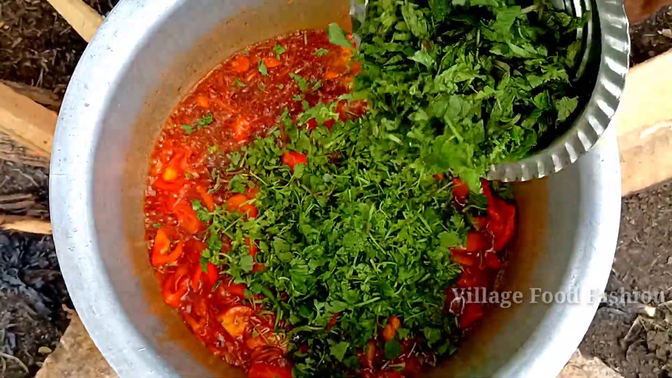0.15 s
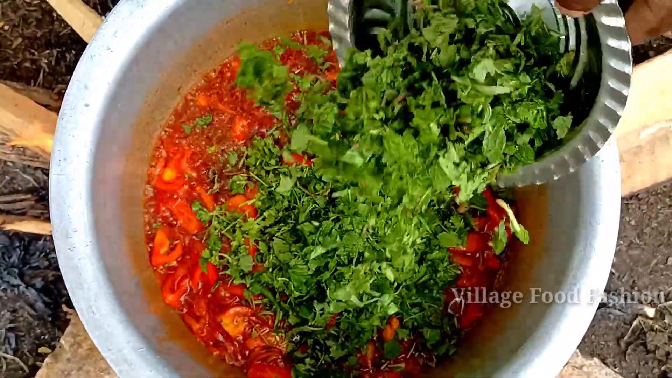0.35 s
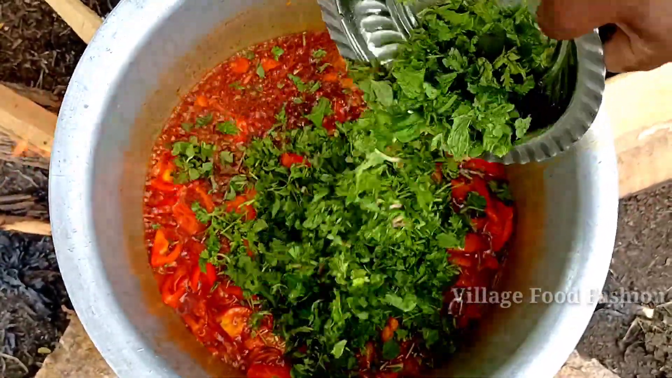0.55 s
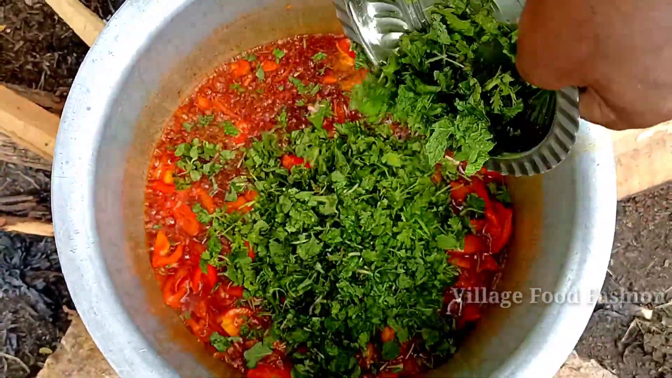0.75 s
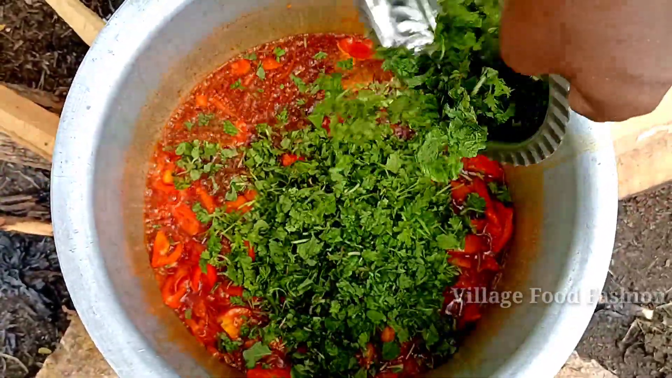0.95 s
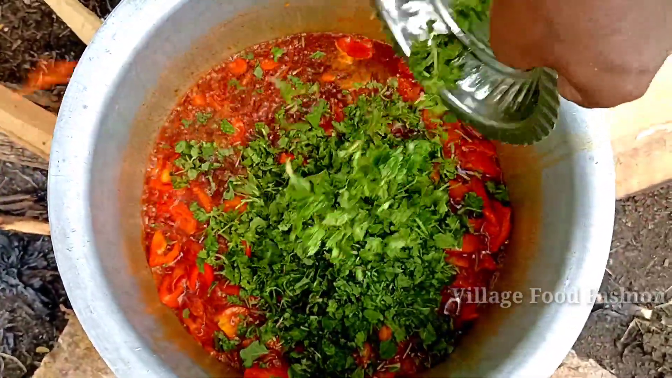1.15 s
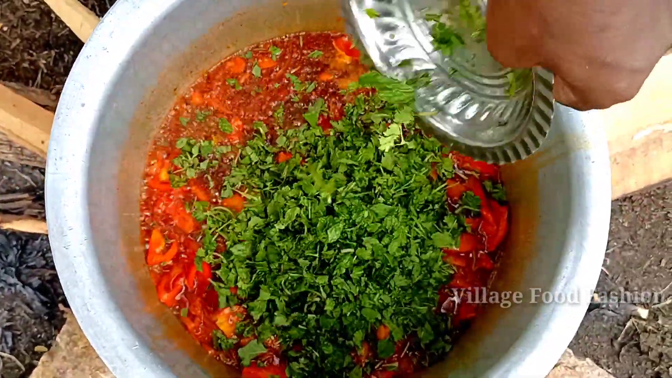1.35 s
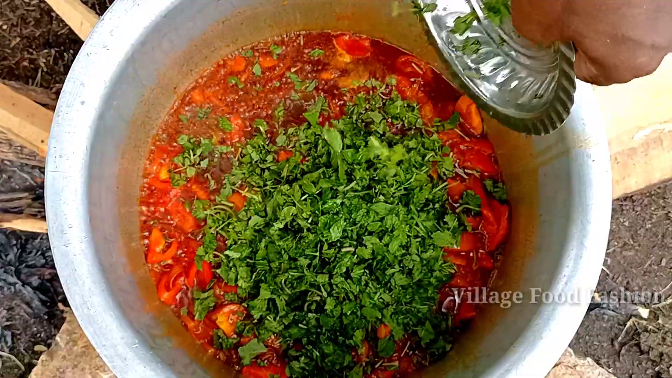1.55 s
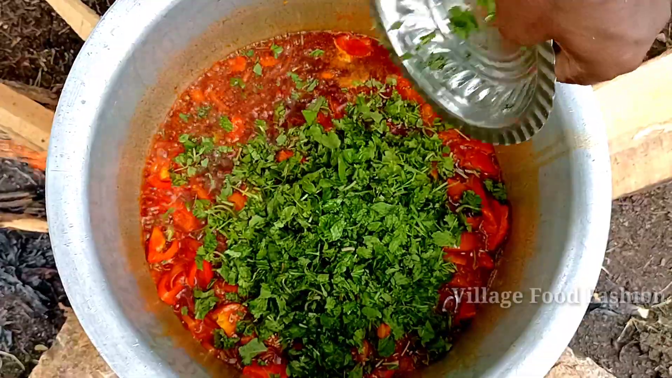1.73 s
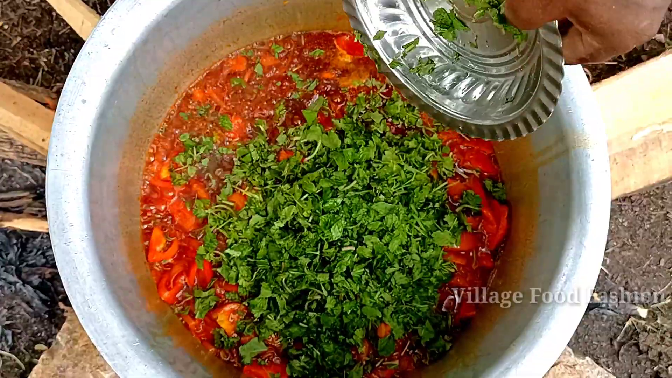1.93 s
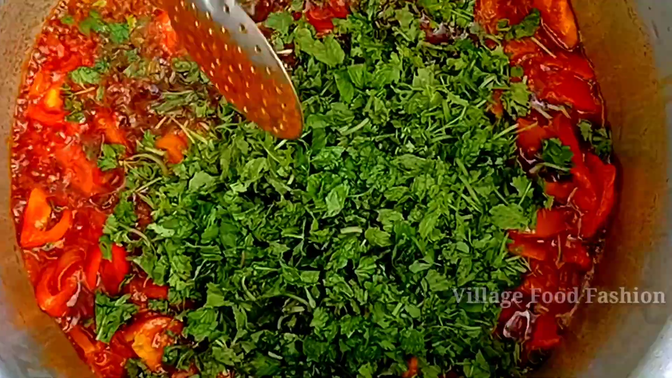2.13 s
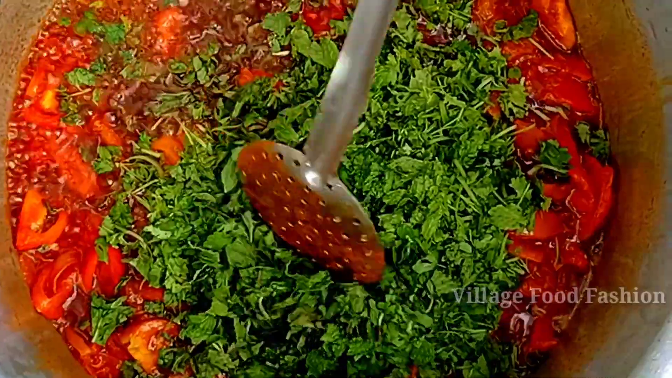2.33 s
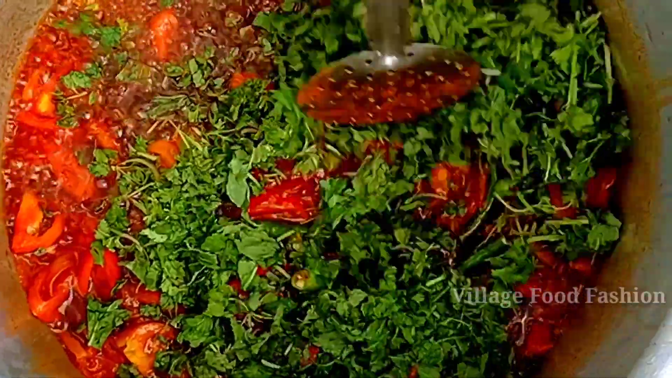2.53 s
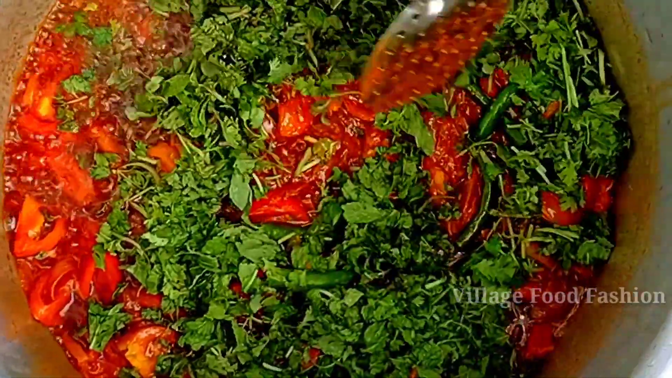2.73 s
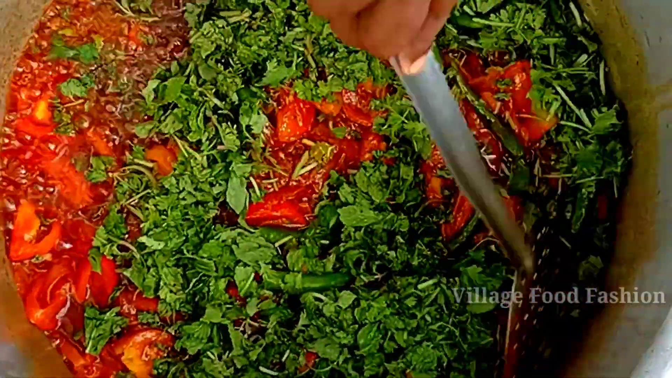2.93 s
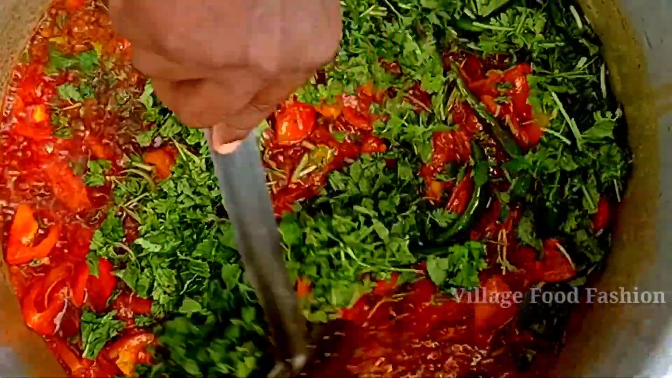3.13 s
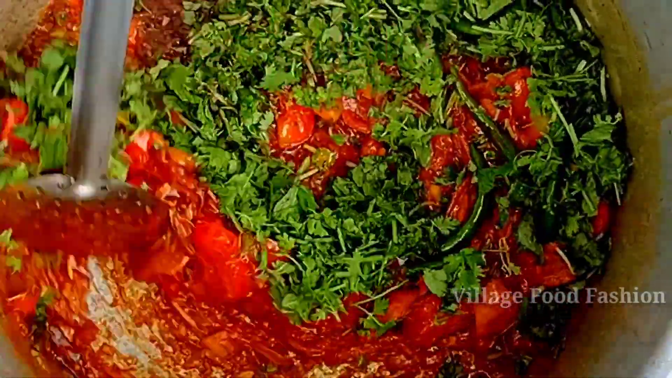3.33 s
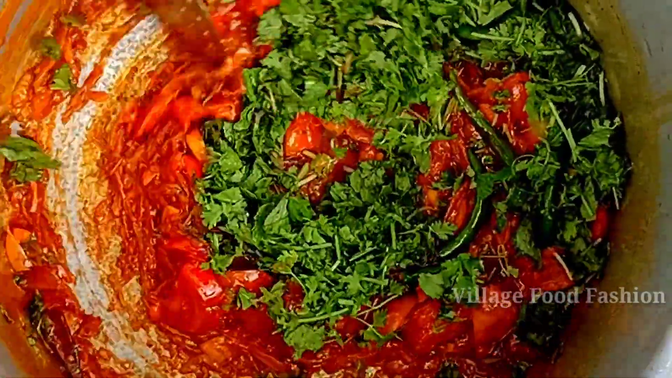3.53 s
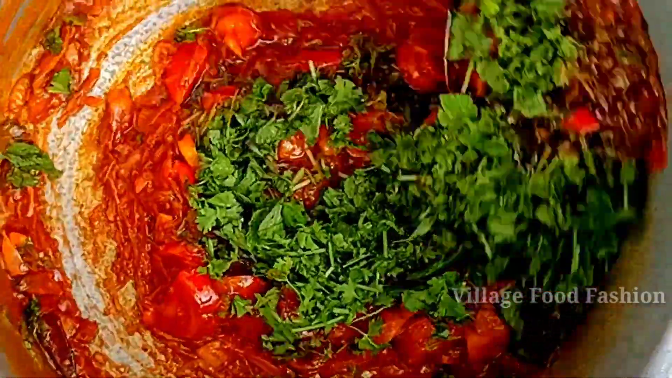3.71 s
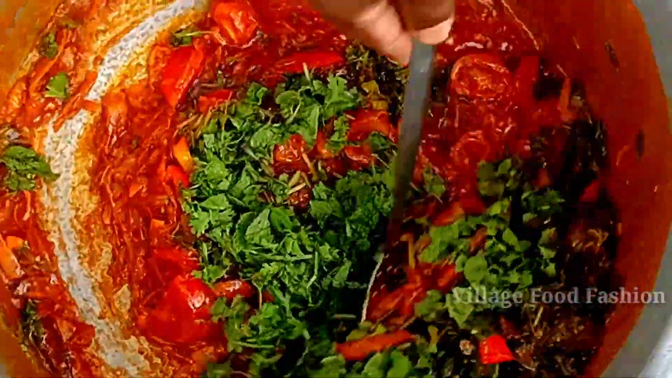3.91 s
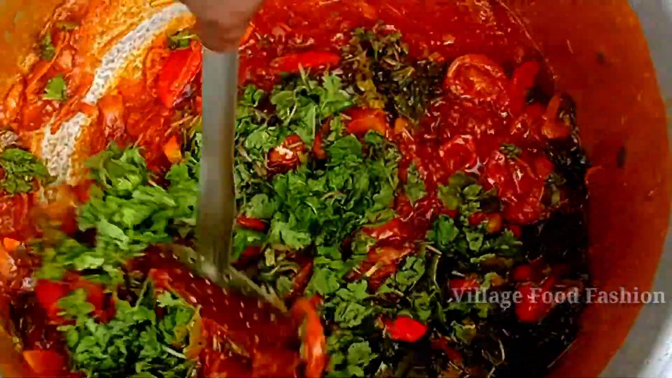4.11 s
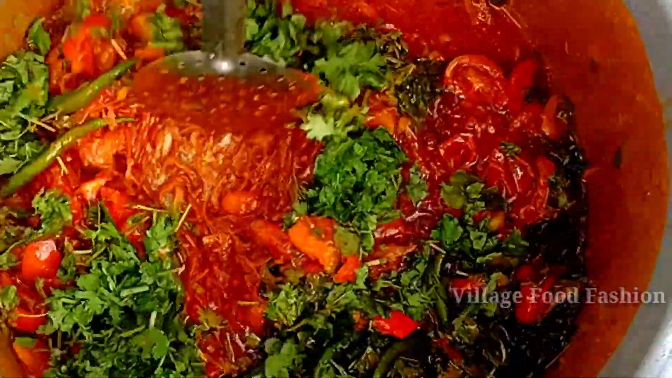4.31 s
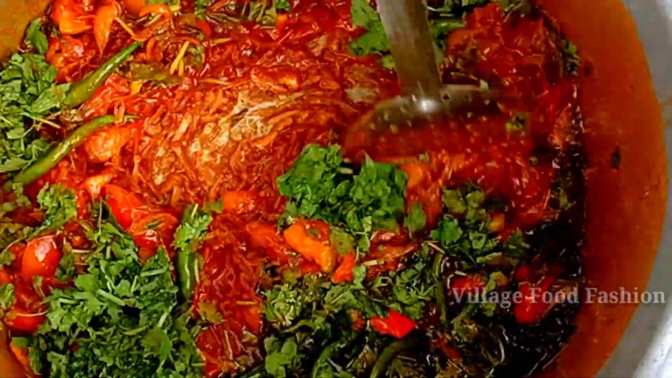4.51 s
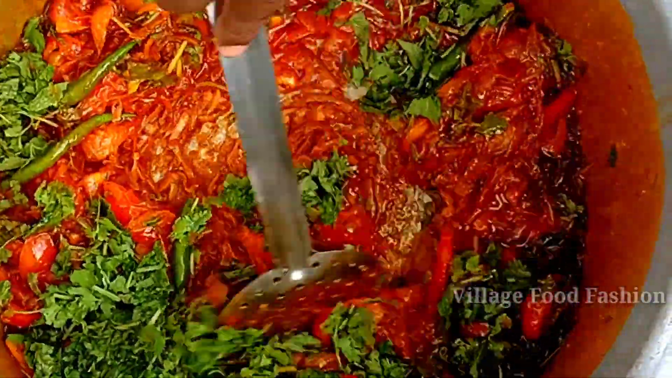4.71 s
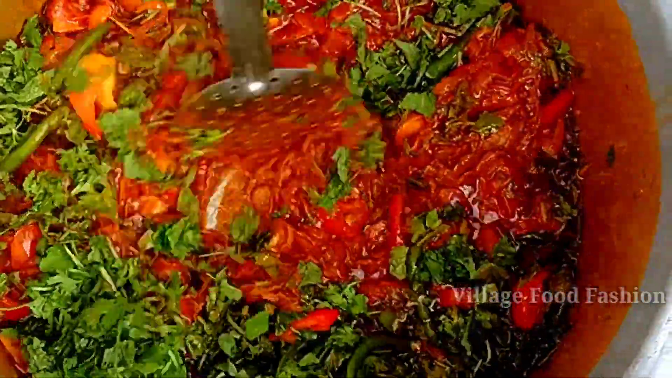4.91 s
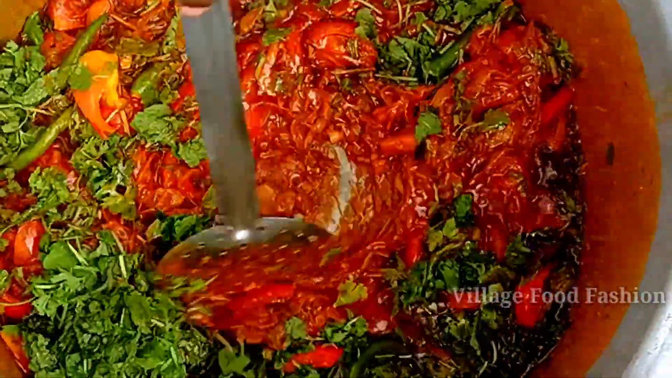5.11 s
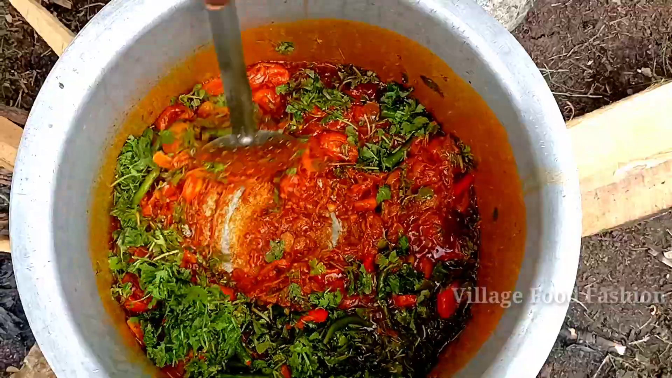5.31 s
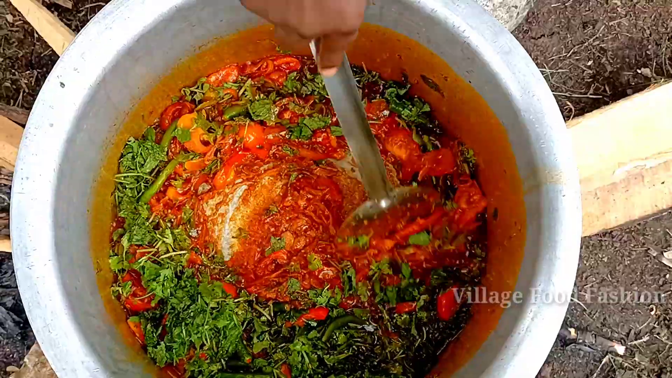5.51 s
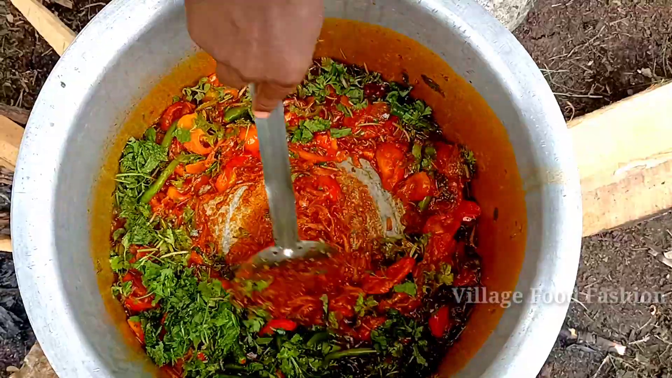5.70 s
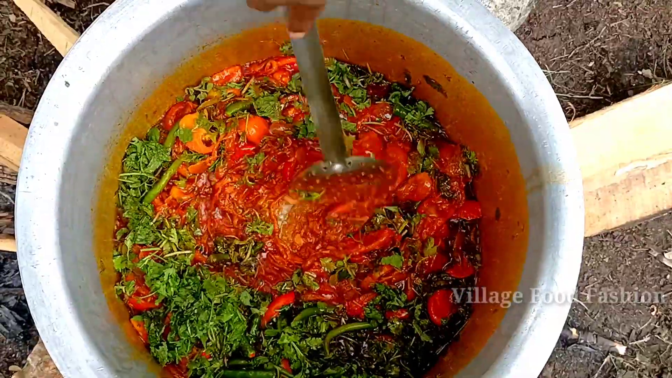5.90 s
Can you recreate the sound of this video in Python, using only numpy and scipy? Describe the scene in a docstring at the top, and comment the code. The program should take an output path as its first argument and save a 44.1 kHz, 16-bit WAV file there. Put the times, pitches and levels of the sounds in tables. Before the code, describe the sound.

Light frying and simmering in a large pot, then a ladle clank, a louder sizzle and repeated metallic scraping.

```python
"""Masala sizzles and simmers in a big aluminium pot outdoors, as tiny steam bubbles burst in the sauce.
The pot knocks, the oil spits, and wet herbs crackle under a steel ladle. With a puff of air the ladle
clanks on the pot and bares the hot bottom, so the sizzle flares up. Then it ploughs and scrapes round
and round, sticking and slipping: the slips squeak and ring the bottom, the wall and the ladle itself."""
import sys
import numpy as np
from scipy import signal
from scipy.fft import rfft, irfft, next_fast_len
from scipy.io import wavfile
from scipy.ndimage import uniform_filter1d, map_coordinates

SR = 44100
rng = np.random.default_rng(int(sys.argv[2]) if len(sys.argv) > 2 else 0)


def log_audio(samples):
    """Write samples as a 16-bit WAV file to the path given in sys.argv[1]."""
    # one column per channel
    frames = np.atleast_2d(samples).T
    # limit to full scale, then quantise
    limited = np.clip(frames, -1, 1)
    pcm = np.round(limited * 32767).astype(np.int16)
    wavfile.write(sys.argv[1], SR, pcm)


N = 262395


def amp(db):
    """Decibels to gain."""
    return 10 ** (np.asarray(db) / 20)


def unit(x):
    """Normalise to rms 1."""
    return x / np.sqrt(np.mean(x ** 2) + 1e-20)


def along(points, hz):
    """Read a curve of (frequency [Hz], value) points on a log frequency axis."""
    freqs, values = np.transpose(points)
    return np.interp(np.log(hz + 1), np.log(freqs + 1), values)


def automation(rows):
    """One automation lane for each column after the time."""
    times, *columns = np.transpose(rows)
    return [np.interp(np.arange(N) / SR, times, column) for column in columns]


def gestures(rows, attack_s, release_s):
    """Envelope of (start [s], hold [s], level [dB]) moves: each swells up to its start, holds, fades."""
    t, power = np.arange(N) / SR, np.zeros(N)
    for start, hold, db in rows:
        before = np.maximum(start - t, 0) / attack_s
        after = np.maximum(t - start - hold, 0) / release_s
        power += amp(2 * db) * np.exp(-2 * (before ** 2 + after))
    return np.sqrt(power)


def wobble(rate):
    """A smooth random modulator, rate points a second."""
    points = rng.standard_normal(int(N * rate / SR) + 4)
    return map_coordinates(points, [np.arange(N) * rate / SR])


def patchy(x, depth_db):
    """Make the tone shimmer with random gain patches, about 500 Hz wide and 40 ms long."""
    spectrogram = signal.stft(x, nperseg=512)[2]
    patches = uniform_filter1d(rng.standard_normal(spectrogram.shape[1:]), size=6, axis=0)
    patches = uniform_filter1d(patches, size=7, axis=1)
    return signal.istft(spectrogram * amp(depth_db * unit(patches)), nperseg=512)[1][:, :N]


def filtered(x, response):
    """Filter x by a complex frequency response."""
    size = next_fast_len(N + SR // 4)
    return irfft(rfft(x, size) * response(np.fft.rfftfreq(size, 1 / SR)), size)[..., :N]


def coloured(x, eq):
    """x through an EQ of (frequency [Hz], gain [dB]) points, at rms 1."""
    return unit(filtered(x, lambda hz: amp(along(eq, hz))))


def resonate(x, modes, low_hz):
    """x through the resonances of a body that radiates little below low_hz, at rms 1."""
    def response(f):
        body = sum((-1) ** k * amp(db) * 1j * f * width / (hz * hz - f * f + 1j * f * width)
                   for k, (hz, width, db) in enumerate(modes))
        low_cut = (f * f / (low_hz ** 2 - f * f + 1j * f * low_hz)) ** 2
        return body * low_cut
    return unit(filtered(x, response))


# how alike left and right are: (frequency [Hz], correlation [-1 to 1])
STEREO_LIKENESS = [(30, .7), (120, .99), (300, 1), (600, 1), (1200, .97), (2500, .14), (5000, .06),
                   (15000, -.68)]

def spread(pair):
    """Two unrelated signals become left and right, centred in the low mids and wide in the treble."""
    def mid_side_gains(hz):
        angle = np.arccos(np.clip(along(STEREO_LIKENESS, hz), -1, 1)) / 2
        return np.array([np.cos(angle), np.sin(angle)])
    mid, side = filtered(pair, mid_side_gains)
    return np.array([mid + side, mid - side])


def stereo_noise():
    """White noise spread across the stereo image."""
    return spread(rng.standard_normal((2, N)))


def grains(rate, scatter_db, noise_db):
    """Stereo crackle: random clicks of uneven size, rate a second, on a bed of noise."""
    size = amp(scatter_db * np.minimum(rng.exponential(size=N), 5))
    clicks = (rng.random(N) < rate / SR) * size * rng.standard_normal((2, N))
    return spread(unit(clicks) + amp(noise_db) * rng.standard_normal((2, N)))


def add(track, start, sound):
    """Mix a sound in at start seconds."""
    part = track[..., round(start * SR):][..., :sound.shape[-1]]
    part += sound[..., :part.shape[-1]]


def pot_reverb(x, t60, wet_db):
    """Each burst bounces between the pot's walls, which smears it into a brief tail of noise."""
    fade = amp(-120 * np.arange(SR // 20) / SR / t60)
    power = np.abs(signal.fftconvolve(x ** 2, fade[None] / fade.sum(), axes=1)[:, :N])
    tail = np.sqrt(power) * stereo_noise()
    return (x + amp(wet_db) * tail) / np.hypot(1, amp(wet_db))


# the fry flares once the ladle bares the hot bottom: (time [s], sizzle level [dB], steam level [dB])
FRY_LEVELS = [(.06, -39.5, -47), (2, -40, -47.5), (2.12, -44, -47.5), (2.45, -38, -49), (3, -40, -45),
              (3.18, -34, -42), (3.395, -31, -30), (3.42, -26, -28), (3.62, -23, -20), (3.85, -25.5, -21),
              (4.3, -26, -26.5), (4.65, -25.5, -26.5), (5.2, -27.5, -30), (5.44, -24.5, -24),
              (5.62, -24, -26), (5.95, -26.5, -24.5)]
# pockets of steam escape from the sauce: (start [s], hold [s], level [dB])
STEAM_SPURTS = [(.195, 0.024, -34), (.49, 0.012, -41), (.735, .015, -37.5), (.95, 0.053, -46),
                (1.92, 0.045, -43)]
# crisp tone of the sizzle: (frequency [Hz], gain [dB])
SIZZLE_EQ = [(150, -39), (450, -18), (700, -12), (1000, -8), (1400, -7), (1900, -6), (2600, 0.5),
             (3400, 1.5), (5200, 0.5), (7200, 0.45), (9200, -10.5), (10700, -20), (15000, -10)]
# airy hiss of flashing steam: (frequency [Hz], gain [dB])
STEAM_EQ = [(3000, -43), (7000, -6.5), (10500, -15), (12000, -17), (13200, -3.5), (14100, 0.5), (15400, -5)]

def frying():
    """Tiny steam bubbles burst; the fiercer the frying, the denser they come."""
    sizzle_db, steam_db = automation(FRY_LEVELS)
    rate = 1800 * amp(sizzle_db - sizzle_db.min())
    bursts = pot_reverb(grains(rate, scatter_db=2.5, noise_db=-39), t60=0.034, wet_db=-1)
    bursts /= np.sqrt(rate / rate.mean())  # hold the level steady as the density rises
    bursts += amp(-5.5) * stereo_noise()
    # patches of sauce boil up and settle, so the colour and level keep shifting
    bursts = patchy(bursts, depth_db=1.5) * amp(0.77 * wobble(12))
    spurts = gestures(STEAM_SPURTS, attack_s=0.01, release_s=0.012)
    sizzle = amp(sizzle_db) * coloured(bursts, SIZZLE_EQ)
    steam = np.hypot(amp(steam_db), spurts) * coloured(bursts, STEAM_EQ)
    return amp(4.5) * (sizzle + steam)


# hollow tone of the bubbling sauce: (frequency [Hz], gain [dB])
SAUCE_EQ = [(100, -7), (190, -8.5), (260, -0.5), (310, 2), (380, -11), (470, -18.5), (660, -9.5),
            (850, -8.5), (990, -5.5), (1200, -11.5), (1900, -15.5), (2500, -8), (3400, -4), (5500, -30),
            (12000, -45)]
# low rumble of the fire: (frequency [Hz], gain [dB])
FIRE_EQ = [(15, 0.5), (30, 0), (45, -3.5), (70, -5.5), (120, -11), (250, -13), (800, -78)]

def simmer():
    """Thick sauce bubbles in the hollow of the pot, over the low flutter of the fire."""
    sauce = coloured(grains(rate=500, scatter_db=2.5, noise_db=0.5), SAUCE_EQ)
    fire = coloured(stereo_noise(), FIRE_EQ) * amp(0.25 * wobble(8))
    return amp(-38) * sauce + amp(-47) * fire


# dull thuds against the pot: (time [s], level [dB], pitch [Hz])
POT_KNOCKS = [(0.0251, 2.5, 275), (1.374, -16, 205), (4.666, -8.5, 430)]

def knocks():
    """A soft blow gives a few heavily damped swings of the full pot."""
    out, t = np.zeros(N), np.arange(SR // 8) / SR
    envelope = amp(-60 * t / 0.018) * (1 - np.exp(-t / 0.00061))
    for start, db, hz in POT_KNOCKS:
        add(out, start, amp(db + 2) * envelope * np.sin(2 * np.pi * hz * t))
    low_hz = 60  # the pot radiates little below this
    return filtered(out, lambda f: 1j * f / (low_hz + 1j * f))


# hard metal hits: (time [s], level [dB], ring trim [dB])
METAL_HITS = [(0.0256, -6.5, -18), (0.0343, -7.5, -27), (3.0897, -2.5, 0.5), (3.0918, -14, -1),
              (3.095, -17, 1)]
# ring of the ladle on the pot: (frequency [Hz], level [dB], time to fade 60 dB [s])
CLANK_MODES = [(525, -30, 0.19), (603, -48, 0.26), (1470, -45, .03), (1640, -29, 0.051), (2490, -9.5, 0.13),
               (2920, -0.5, 0.067), (3010, -28, .06), (3715, -8.5, 0.094), (4930, -18, 0.083),
               (6120, -9.5, .02), (7200, -13, 0.031)]

def clanks():
    """Steel meets aluminium: a crack, and a buzzing ring that the sauce soon smothers."""
    ring, crack, t = np.zeros((2, N)), np.zeros((2, N)), np.arange(SR // 4) / SR
    for start, db, ring_db in METAL_HITS:
        for hz, mode_db, t60 in CLANK_MODES:
            buzz = 0.06 * np.cumsum(rng.standard_normal(len(t)))
            scatter_db = rng.normal(0, 1.5, (2, 1))
            mode = amp(mode_db + scatter_db - 60 * t / t60) * np.sin(2 * np.pi * hz * t + buzz)
            add(ring, start, amp(db + ring_db - 3) * mode)
        add(crack, start, amp(db - 7) * rng.standard_normal((2, len(t))) * amp(-60 * t / 0.029))
    crack_eq = [(200, -6), (1200, 9.5), (3000, 13.5), (5500, 3.5), (10000, -6), (15000, -23)]
    return ring + filtered(spread(crack), lambda hz: amp(along(crack_eq, hz)))


# spits of oil and ticks of stalks: (time [s], level [dB], pitch [Hz], decay [ms])
OIL_SPITS = [(.1392, -16.5, 3530, 3.9), (.4864, -14, 6500, 1.1), (.5038, -14, 13900, .8),
             (.5727, -24, 4130, 3), (.9274, -18.5, 3440, 3.2), (.9503, -13.5, 6900, .8),
             (.9997, -17, 9000, .2), (1.2511, -20, 3120, 0.99), (1.5315, -15, 6440, .73),
             (1.7425, -15.5, 5100, .85), (1.9924, -10.5, 9400, 0.23), (2.1481, -18.5, 6200, .7),
             (2.3776, -16.5, 3460, 2.5), (2.427, -16, 2700, 0.5), (2.4798, -18, 6230, 1.1),
             (2.6195, -15, 3240, .66), (2.631, -18, 1230, 1.9)]

def spits():
    """Each spit is a pitched pop with a tail off the wall and a spray; fainter ones come at random."""
    out, t = np.zeros((2, N)), np.arange(SR // 40) / SR
    faint = rng.uniform([0, -32, 2600, 0.2], [N / SR, -23, 9000, 1], (120, 4))
    wall_tail = amp(-15.5 - 60 * t / 0.033)
    for start, db, hz, decay_ms in [*OIL_SPITS, *faint]:
        # the neck of the bubble flutters as it tears, which blurs the pitch
        flutter = 0.18 * np.cumsum(rng.standard_normal((2, len(t))), axis=1)
        envelope = np.exp(-t * 1000 / decay_ms) + wall_tail
        pop = envelope * np.sin(2 * np.pi * hz * t + flutter)
        spray = amp(-30 - 60 * t / 0.0058) * rng.standard_normal((2, len(t)))
        add(out, start, amp(db - 0.5) * (pop + spray))
    return out


# the ladle presses into the herbs: (start [s], hold [s], level [dB])
HERB_PRESSES = [(2.31, 0.29, -37), (2.61, .035, -37), (2.78, .04, -40)]

def squelch():
    """Wet leaves and stalks crackle under the ladle."""
    press = gestures(HERB_PRESSES, attack_s=0.024, release_s=0.21)
    hollows = [(650, 98, -11), (1200, 97, 1), (1580, 470, -4.5), (2550, 140, 10), (3340, 1000, -1.5)]
    return press * resonate(grains(rate=420, scatter_db=3, noise_db=-27), hollows, low_hz=400)


def draught():
    """A bassy puff of air brushes the microphone as the hand passes."""
    puff_db, = automation([(2.75, -66.5), (2.97, -35), (3.1, -52), (3.3, -42), (3.5, -71)])
    puff_eq = [(20, 0.5), (35, 2), (70, -4), (130, -27), (400, -52)]
    return amp(puff_db) * coloured(stereo_noise(), puff_eq)


# between scrapes the blade drags on the bottom: (time [s], level [dB])
BLADE_DRAG = [(3.1, -59.5), (3.3, -41), (3.7, -37.5), (3.88, -46.5), (4.25, -35.5), (4.52, -36), (4.6, -26),
              (5.09, -31.5), (5.3, -27), (5.95, -26)]
# the blade judders over the bottom: (start [s], level [dB])
BLADE_JUDDERS = [(4.26, -28.5), (4.597, -19.5), (4.656, -17), (4.785, -24), (4.965, -20), (5.025, -26),
                 (5.18, -26.5), (5.447, -19.5), (5.539, -21.5), (5.665, -19.5), (5.895, -24)]
# strokes along the wall: (start [s], hold [s], wall ring [dB], ladle chatter [dB])
WALL_SCRAPES = [(3.158, 0.024, -27, -31), (3.412, 0.068, -26, -22), (3.615, 0.064, -23.5, -22.5),
                (4.374, 0.031, -28, -20.5), (4.635, 0.085, -22, -25), (4.875, 0.079, -30.5, -25.5),
                (5.093, 0.09, -24.5, -27), (5.284, 0.16, -24.5, -23), (5.536, .04, -22.5, -27),
                (5.595, 0.059, -17.5, -18.5), (5.78, 0.071, -23.5, -22), (5.898, .05, -27.5, -24)]
# low body of the pot's bottom: (frequency [Hz], width [Hz], gain [dB])
BOTTOM_MODES = [(299.5, 77, 7), (359, 22, -4), (452, 270, -12)]
# midrange ring of the pot's wall: (frequency [Hz], width [Hz], gain [dB])
WALL_MODES = [(494, 250, -10.5), (1000, 127, 0), (1143, 78, 4), (1530, 200, -1.5), (2050, 720, -7)]
# bright ring of the ladle: (frequency [Hz], width [Hz], gain [dB])
LADLE_MODES = [(2505, 80, -4.5), (2934, 29, 1), (3680, 790, -11.5), (4680, 125, -5.5)]

def scraping():
    """The ladle sticks and slips; the slips ring the sauce-damped bottom, the wall and the ladle."""
    def slips(rate):
        return grains(rate, scatter_db=0.9, noise_db=-2) * amp(1.13 * wobble(55))
    drag = amp(automation(BLADE_DRAG)[0])
    judder = gestures([(s, 0.016, db) for s, db in BLADE_JUDDERS], attack_s=0.0073, release_s=0.011)
    stroke = dict(attack_s=0.015, release_s=0.039)
    on_wall = gestures([(s, hold, db) for s, hold, db, _ in WALL_SCRAPES], **stroke)
    chatter = gestures([(s, hold, db) for s, hold, _, db in WALL_SCRAPES], **stroke)
    rub = coloured(slips(450), [(120, -13), (200, -10.5), (270, 0), (450, -0.5), (900, -9)])
    bottom = resonate(rub, BOTTOM_MODES, low_hz=216)
    # as the point of contact travels, it favours now one mode, now another
    wall = resonate(patchy(slips(700), depth_db=2), WALL_MODES, low_hz=358)
    ladle = resonate(patchy(slips(700), depth_db=2), LADLE_MODES, low_hz=1520)
    # some of the drag bleeds into the wall and the ladle
    return (np.hypot(drag, judder) * bottom
            + np.hypot(amp(-10.5) * drag, on_wall) * wall
            + amp(1) * np.hypot(amp(-8.5) * drag, chatter) * ladle)


# the ladle's edge catches: (centre time [s], length [s], pitch [Hz], level [dB])
EDGE_SQUEAKS = [(3.126, 0.024, 2965, -21), (3.134, 0.091, 648, -30), (3.198, 0.073, 2490, -26),
                (4.387, .03, 2980, -20.5), (4.912, 0.031, 1514, -17.5), (5.107, .016, 1150, -20),
                (5.186, 0.043, 1144, -17.5), (5.341, .02, 2530, -14), (5.367, 0.025, 2660, -10),
                (5.381, 0.021, 2973, -6), (5.432, 0.043, 1116, -16.5), (5.611, 0.024, 2620, -12.5),
                (5.63, .034, 1570, -14)]

def squeaks():
    """For a moment the slips lock roughly to one mode of the ladle or the wall."""
    out, t = np.zeros((2, N)), np.arange(N) / SR
    waver = 0.7 * wobble(200)
    roughness = unit(amp(3 * wobble(260)))
    for centre, length, hz, db in EDGE_SQUEAKS:
        swell = np.exp(-(2 * (t - centre) / length) ** 2)
        out += amp(db) * swell * roughness * np.sin(2 * np.pi * hz * t + waver)
    return out


# the ladle pushes through the thick masala: (start [s], hold [s], level [dB])
PLOUGH_STROKES = [(3.18, .16, -38), (3.412, 0.028, -23), (3.55, .07, -26.5), (3.635, 0.061, -23)]

def ploughing():
    """Spice grit and tomato rasp under the blade in the first wide sweep."""
    strokes = gestures(PLOUGH_STROKES, attack_s=0.0086, release_s=0.044)
    grit = grains(rate=600, scatter_db=1.5, noise_db=-6)
    rasp_eq = [(60, -33), (150, -12), (220, 2.5), (300, -1), (450, -12),
               (700, 1), (1400, 0.5), (2200, -9.5), (4500, -3.5), (10000, -33)]
    return strokes * coloured(grit, rasp_eq)


def scene():
    """The close-up mix: a cooking bed, with stirring, hits and a puff of air on top."""
    cooking = frying() + simmer() + spits()
    stirring = squelch() + ploughing() + scraping() + squeaks()
    return cooking + stirring + knocks() + clanks() + draught()


# balance of the two microphone ports: (frequency [Hz], left minus right [dB])
PORT_BALANCE = [(300, -0.5), (950, -0.5), (1300, -1.5), (2500, -2.5), (4500, 1), (6500, -2), (8100, 6.5),
                (9500, 5), (11000, -6), (12500, -7), (14000, -25), (15500, -3)]
# how far the left port leads: (frequency [Hz], phase lead [rad])
PORT_LEAD = [(100, 0), (300, 0.16), (1200, 1.08), (1550, 1.63), (2600, 4.5), (4800, 10.5), (8000, 14),
             (15000, 26)]

def record(dry):
    """The left port hears the pot first, each colours the treble; peaks clip softly, the top is cut."""
    def ports(hz):
        ratio = amp(along(PORT_BALANCE, hz))
        early = np.exp(0.5j * along(PORT_LEAD, hz))
        return np.array([ratio * early, 1 / early]) * np.sqrt(2 / (1 + ratio ** 2))
    stereo = filtered(dry, ports)
    clipped = stereo / (1 + stereo ** 8) ** (1 / 8)
    return filtered(clipped, lambda hz: hz < 15650)


dry = scene()
out = record(dry)
log_audio(out)
```